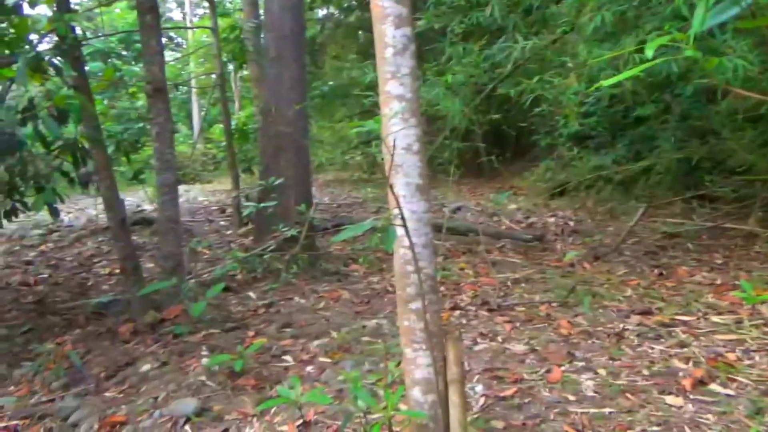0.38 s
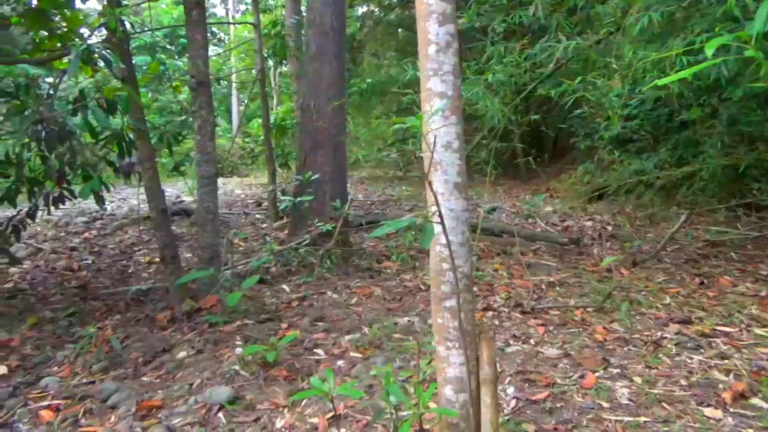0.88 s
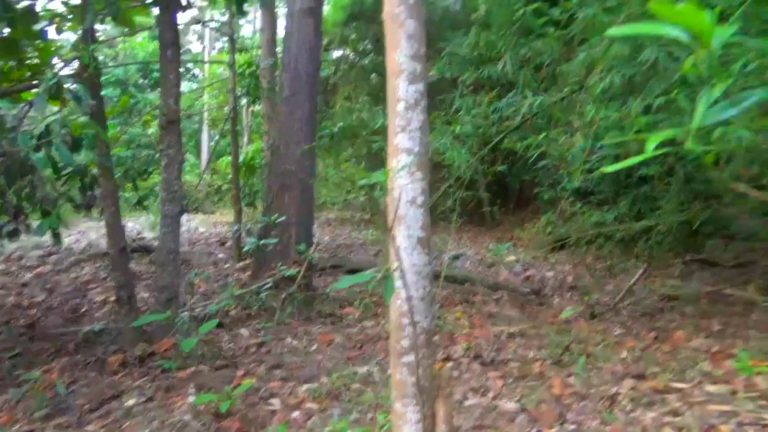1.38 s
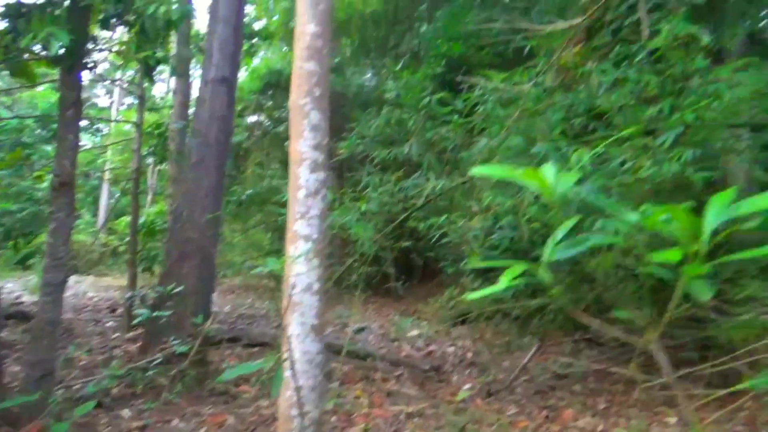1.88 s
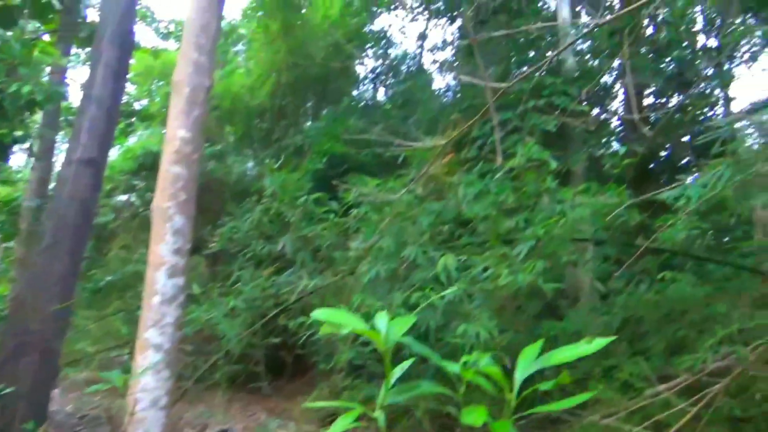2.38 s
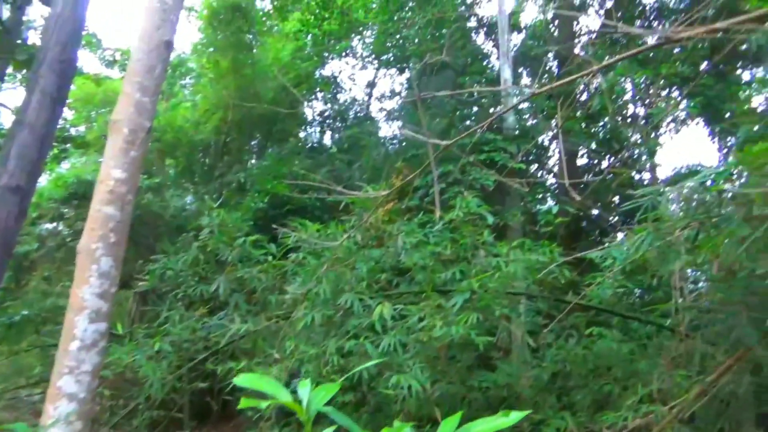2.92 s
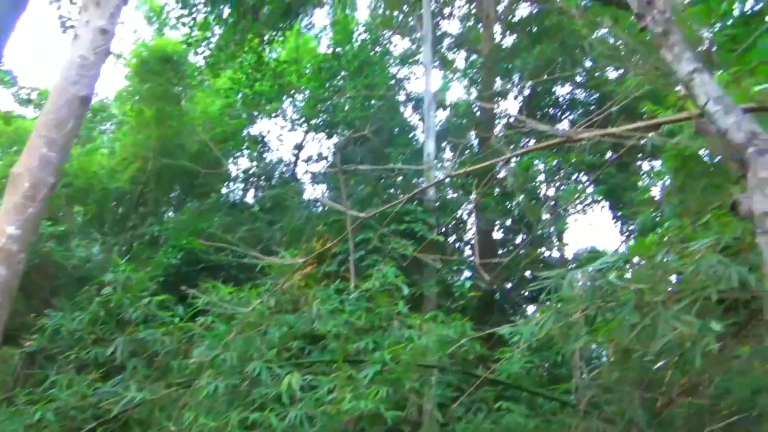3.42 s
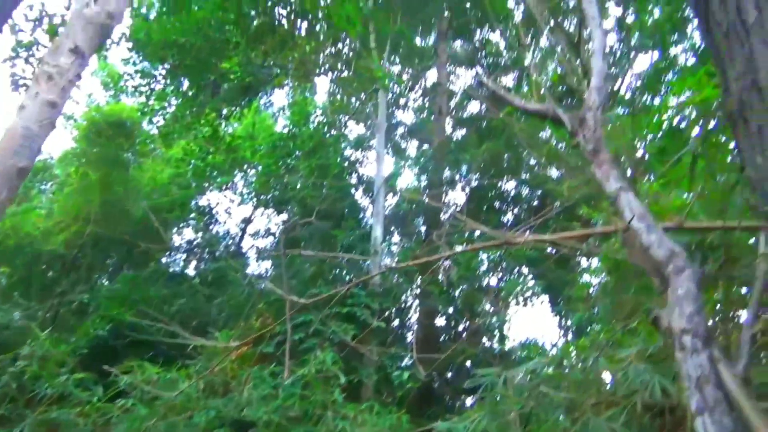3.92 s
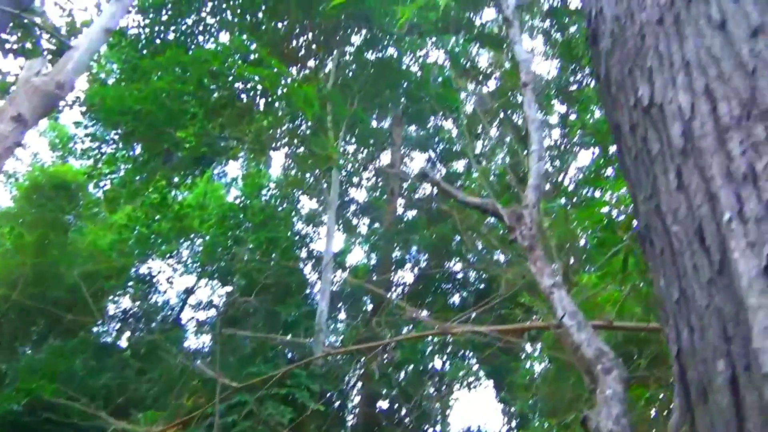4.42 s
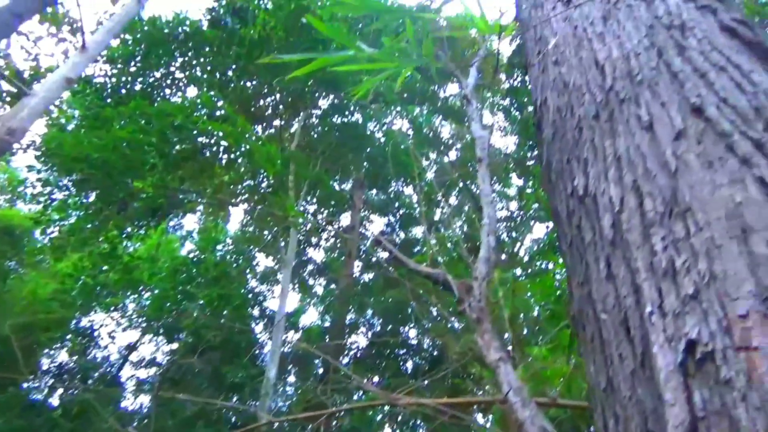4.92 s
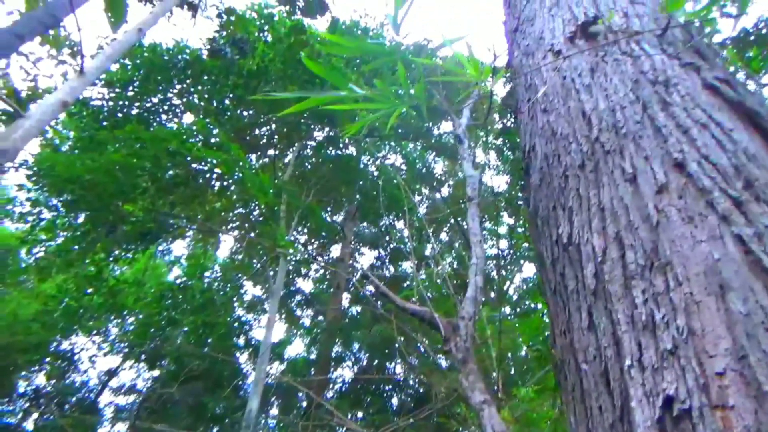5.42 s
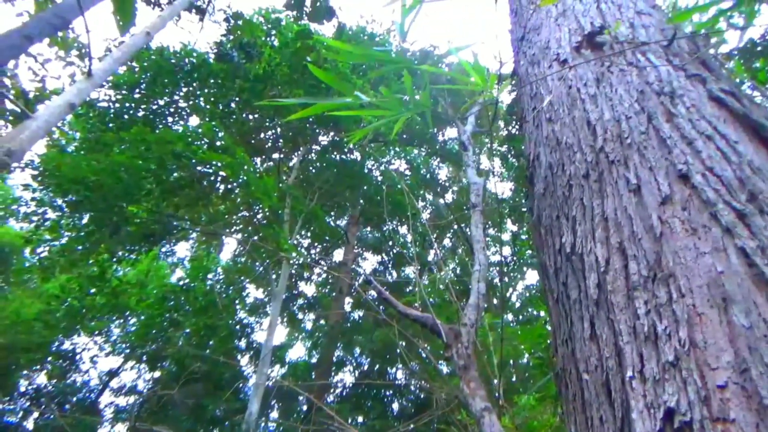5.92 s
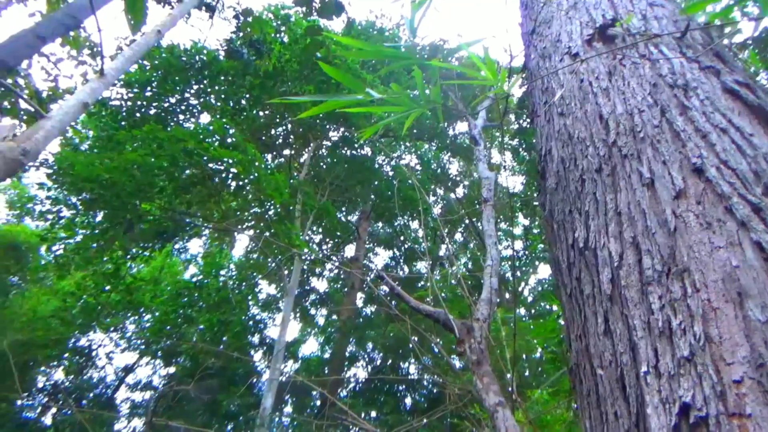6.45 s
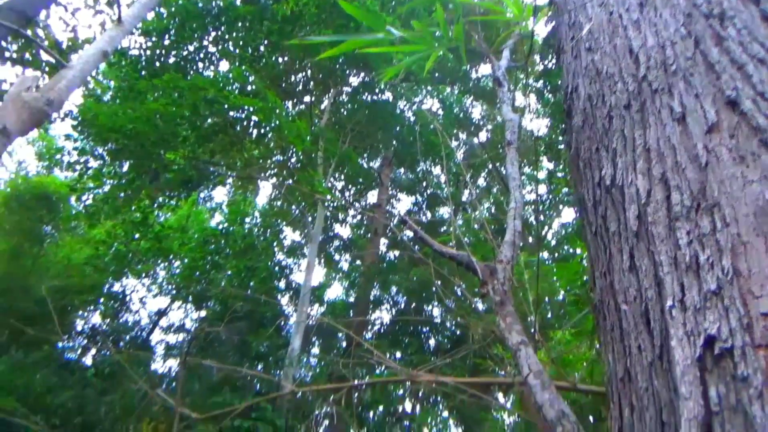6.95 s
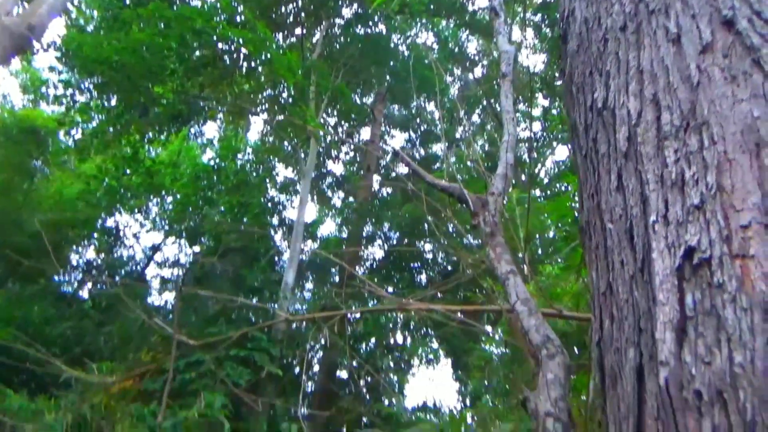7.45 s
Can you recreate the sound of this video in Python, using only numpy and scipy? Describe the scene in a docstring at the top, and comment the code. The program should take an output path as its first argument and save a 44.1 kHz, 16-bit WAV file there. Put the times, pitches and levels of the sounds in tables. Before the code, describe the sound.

A nearby cicada repeatedly buzzes low and winds up into a piercing held hiss, over a distant insect chorus, stirring leaves and hoarse bird rasps.

```python
"""A tropical forest by day, on one microphone. From the start a cicada buzzes low with its abdomen raised, then winds up
to a held high hiss: tymbal clicks, about two hundred a second, pulse the ringing of its body. Under it a second cicada
sings lower, far insects blend into a smooth hiss of noise, leaves stir as puffs of filtered noise and a rumble lies far
off. At 1 s and 3 s a hand softly bumps the microphone, a damped low tone; from 3 s a distant bird gives hoarse rasps,
two sliding strands of narrow noise. The near cicada repeats its buzz, wind-up and hiss until the end."""
import sys
import numpy as np
from scipy import signal
from scipy.fft import rfft, irfft, next_fast_len
from scipy.io import wavfile
from scipy.ndimage import uniform_filter1d, map_coordinates

SR = 44100
rng = np.random.default_rng(int(sys.argv[2]) if len(sys.argv) > 2 else 0)


def boost_factor(decibels):
    """Convert a level in decibels to a linear amplitude factor."""
    exponent = np.asarray(decibels, float) / 20
    return 10 ** exponent


def persist_wave(psi):
    """Save psi, clipped to +-1, as 16-bit WAV."""
    counts = np.round(np.clip(psi, -1, 1) * 32767).astype(np.int16)
    wavfile.write(sys.argv[1], SR, np.atleast_2d(counts).T)


N = 333820

# Near cicada's phrases: (abdomen lifts [s], held note reached [s], first swell [dB], second swell [dB],
# upper modes relative to lower [dB])
PHRASES = [(-.07, 1.355, -64, -61.5, -4), (2.048, 3.361, -56, -54, 2), (4.114, 5.447, -47.5, -48.5, -0.5),
           (6.21, 7.32, -54, -52.5, -1)]
# Click rate of the muscle through the buzz: (time after the lift [s], rate [clicks/s])
BUZZ_RATE = [(-.07, 204), (.1, 195), (.29, 214), (.46, 228), (.59, 197)]
# Wind-up from the buzz to the held note: (share of the way [0-1], rate [clicks/s])
WIND_UP = [(.26, 213), (.63, 215.5), (1, 233)]
TOP_RATE = 233  # clicks per s on the held note
DROOP_S = .2  # the held note lets go this long before the next lift
# Abdomen posture: (time after the lift [s], raised [0-1])
LIFT = [(-.1, 0.02), (.12, 0.9), (.36, 0.75), (.6, 0)]
# buzz shape, s after the lift: top of the first swell, dip, top of the second swell, cut, silence
SWELL_S, DIP_S, AGAIN_S, CUT_S, OVER_S = 0.068, 0.2, 0.38, 0.507, 0.61
# start under the first swell, dip under the mean of the swells, cut under the second swell
SWELL_FROM_DB, DIP_DB, SAG_DB = 10, 4.5, 6
# Body modes with the abdomen raised, a lower and an upper group: (frequencies [Hz])
BUZZ_HZ = [
    [1975, 2190, 3990, 4200, 4385, 4521, 4700],
    [5000, 5290, 5520, 5690, 6050, 6290, 6410, 6550],
]
# Relative levels of those modes, by group: (levels [dB])
BUZZ_DB = [
    [-12, -13, -7, -3, -4, -8, -9],
    [-1, -1, -1, 0.5, 0.5, -0.5, -1.5, -6],
]
# Membrane tone on each held note: (time [s], frequency [Hz])
MEMBRANE = [(1.6, 2133), (3.7, 2136), (5.8, 2140), (7.4, 2143)]
SLACK_SAG_HZ = 340  # drop of the membrane tone per unit of slack (0 at the top rate, 1 at rest)
# Abdomen down: overtones of the membrane with side tones one click rate apart, in five groups, low to high:
# (overtone number, first side tone, last side tone)
SIDE_TONES = [
    [(1, -1, 1)],
    [(2, 5, 9), (3, 0, 0)],
    [(3, 6, 9)],
    [(4, -1, 4)],
    [(4, 5, 11)],
]
# Body resonance that shapes each group: (frequency [Hz], level [dB])
RESONANCES = [
    [(1700, -12), (1900, -1.5), (2140, 0), (2370, -9)],
    [(5300, -10), (5680, -3), (5900, -4), (6140, 0), (6280, -8), (6420, -2), (6600, -12)],
    [(7500, -14), (7820, -5), (8050, 0), (8290, -9), (8500, -15)],
    [(8100, -10), (8330, -1), (8500, 0), (8800, -2), (9100, -4), (9500, -6)],
    [(9400, -9), (9730, -5), (9960, -5), (10170, 0), (10420, -2.5), (10650, -8), (11000, -10)],
]
# Loss of each group, low to high, with the abdomen fully raised: (loss [dB])
RAISED_LOSS_DB = [2.7, 0.95, 6.6, 2.4, 8.6]
# Gain of each group, low to high, on the held note: (gain [dB])
HELD_GAIN_DB = [6, 0.78, 0.55, 1.3, 0.85]
# The turning microphone hears the groups differently; levels before the loss and gain above:
# (time [s], level of each of five groups low to high [dB], shift of the third resonance [Hz])
FACING = [(0, -68.5, -53.5, -59, -58, -64, 218.5), (1.2, -78, -58, -61, -61.5, -61, 221.5),
          (1.799, -75, -57.5, -60, -58, -62.5, 217.5), (2.7, -73, -56, -61, -57, -60, 147),
          (3.6, -69, -58, -58.5, -55.5, -61, 100), (4.7, -66, -57, -55.5, -57.5, -52, 2),
          (5.899, -73, -59.5, -54.5, -55, -53.5, -1), (6.9, -67.5, -55, -54.5, -56, -53, 3),
          (7.12, -69, -59.5, -58, -54.5, -54.5, 0.5), (7.57, -59.5, -57.5, -58.5, -56, -53, 0.5)]
# Second, lower cicada, from which the microphone turns away: (time [s], rate [clicks/s], level [dB])
OTHER = [(0, 170, -54.5), (.5, 182, -54.5), (.9, 190, -53.5), (1.25, 120, -54.5), (2, 130, -57),
         (3, 130, -57.5), (4, 170, -64), (5, 120, -67), (7.57, 77, -71)]
# Its body modes: (frequencies [Hz])
OTHER_HZ = [1762, 7400, 7660, 9130, 9330, 9510]
# Relative levels of its modes: (levels [dB])
OTHER_DB = [-12.5, -6, -4.5, -4.5, -10, -3.5]
# Reference level of the far insects, offset for the chorus and for the soft hiss: (time [s], level [dB])
CHORUS = [(0, -52), (.8, -54.5), (2.1, -52.5), (2.8, -52), (3.7, -49.5), (4.7, -50.5), (5.3, -52.5),
          (6.4, -53), (6.8, -52), (7.57, -51.5)]
# Spectrum of the far insects: (frequency [Hz], relative density [dB per Hz])
FAR = [(2650, -34), (4500, -8), (5270, 1), (5720, -3.5), (6210, -1), (6740, -3.5), (7130, 1), (7650, -5.5),
       (8340, -1.5), (9690, -5), (10500, -5.5), (11000, -8.5), (14300, -38), (22000, -120)]
# Reference level of the breeze in the leaves, offset where used: (time [s], level [dB])
BREEZE = [(0, -63), (1.1, -63), (1.4, -61), (2.38, -62), (2.45, -59), (2.6, -59), (2.9, -61), (3.9, -59),
          (4.2, -57.5), (4.55, -56), (4.8, -57.5), (5.3, -58.5), (6.1, -60.5), (6.7, -60.5), (7.57, -57.5)]
# Spectrum of the leaves: (frequency [Hz], relative density [dB per Hz])
LEAVES = [(120, -14), (200, -7), (313, -4.5), (397, -0.5), (741, 0.5), (894, -1.5), (1010, 1.5), (1110, -1),
          (1220, 0.5), (1570, -4), (1740, -3.5), (2400, -4.5), (3120, -9.5), (5280, -120)]
# Spectrum of the soft hiss: (frequency [Hz], relative density [dB per Hz])
STILL = [(1060, -19.5), (1800, -12), (2170, -3.5), (2800, -9.5), (3230, -7.5), (3400, -0.5), (3800, 0),
         (4300, -4.5), (4700, -22), (6110, -37), (10300, -120)]
# Distant rumble: (time [s], level [dB])
DISTANT = [(0, -74), (.8, -70), (3.2, -71), (4.4, -69.5), (5.2, -70.5), (7.57, -70.5)]
# Spectrum of the rumble: (frequency [Hz], relative density [dB per Hz])
RUMBLE = [(12, -39.5), (20, -10), (53, -3), (250, -2.5), (320, -39), (550, -120)]
# Soft bumps of the hand: (time [s], initial envelope [dB], frequency [Hz])
BUMPS = [(1.074, -53.5, 145), (3.075, -59.5, 145)]
BUMP_T60_S = 0.096
# Bird's rasps: (start [s], length [s], top of the swell [dB], onset under that top [dB])
RASPS = [(3.023, .19, -51, 0.5), (3.557, 0.19, -48.5, 4), (5.89, 0.062, -61.5, -3), (6.778, 0.19, -51, 1),
         (7.098, .035, -58.5, 6), (7.244, 0.25, -48.5, 7)]
# a rasp swells in over a share of its length, sags, breaks off to a weak tail and fades
RASP_ATTACK_S, RASP_SWELL, RASP_SAG_DB = .02, .4, 3
RASP_BREAK_S, RASP_TAIL_DB, RASP_FADE_S = .03, 10.5, .11
RASP_FLUTTER_HZ, RASP_FLUTTER_DB = 33.8, 2.5  # central rate, swing either way
# Two sides of the bird's voice box: (time [s], stronger strand [Hz], weaker strand [Hz],
# weaker under stronger [dB], strand width [Hz])
STRANDS = [(3.01, 2980, 3000, 8, 300), (3.08, 2800, 3080, 4, 480), (3.15, 2880, 3250, 3, 560),
           (3.21, 2650, 3150, 2, 560), (3.55, 2920, 3050, 4, 400), (3.59, 3030, 3200, 1, 380),
           (3.78, 3030, 3200, 2, 400), (5.89, 2850, 2900, 9, 300), (5.97, 2680, 2750, 9, 300),
           (6.77, 3030, 3150, 5, 420), (6.85, 3050, 3330, 3, 600), (6.96, 3080, 3450, 5, 620),
           (7.09, 2960, 3000, 9, 350), (7.13, 2920, 3000, 9, 350), (7.24, 2550, 3150, 0, 650),
           (7.32, 2580, 3100, 3, 600), (7.39, 2850, 2550, 2, 600), (7.45, 3000, 2650, 1, 560),
           (7.51, 2900, 2650, 1, 560)]
# Spectrum of the broad scratch in the voice: (frequency [Hz], relative density [dB per Hz])
SCRATCH = [(150, -120), (350, -2.5), (1500, -2.5), (3500, 0), (4600, -7), (7000, -120)]
SCRATCH_DB = -4.5  # relative to the strands
TOP_HZ = 11020  # middle of the microphone's upper band edge


def unit(x):
    """Normalization of power: x scaled to rms 1."""
    return x / np.sqrt(np.mean(x ** 2) + 1e-20)


def curves(rows):
    """Linear interpolation: one value per sample for each column after the time."""
    s, *columns = np.transpose(rows)
    return [np.interp(np.arange(N) / SR, s, column) for column in columns]


def wobble(rate):
    """Band-limited random process: smooth through rate random knots a second; the rate may change with time."""
    place = np.cumsum(rate * np.ones(N)) / SR
    return map_coordinates(rng.standard_normal(int(place[-1]) + 4), [place])


def filtered(x, response):
    """Linear filtering: the spectrum of x times a response of frequency."""
    size = next_fast_len(N + 8192)
    return irfft(rfft(x, size) * response(np.fft.rfftfreq(size, 1 / SR)), size)[..., :N]


def coloured(x, spectrum):
    """Spectral shaping: x through (Hz, dB) points read on a log axis, at rms 1."""
    hz, db = np.transpose(spectrum)
    return unit(filtered(x, lambda f: boost_factor(np.interp(np.log(f + 1), np.log(hz), db))))


def patchy(depth_db, size):
    """Nonuniform noise: random gain in time and pitch; a long frame makes its patches narrow and lasting."""
    z = signal.stft(rng.standard_normal(N), nperseg=size)[2]
    field = uniform_filter1d(rng.standard_normal(z.shape), size=3, axis=0)  # across pitch
    field = uniform_filter1d(field, size=5, axis=1)  # across time
    return signal.istft(z * boost_factor(depth_db * unit(field)), nperseg=size)[1][:N]


def echoes(x, t60, wet):
    """Diffuse reverberation: trunks and leaves send back a share of the energy as a short decaying tail."""
    t = np.arange(SR // 2) / SR
    tail = rng.standard_normal(len(t)) * boost_factor(-60 * t / t60)
    tail /= np.linalg.norm(tail)
    share = np.clip(wet, 0, 1)
    return np.sqrt(1 - share) * x + np.sqrt(share) * signal.fftconvolve(x, tail)[:N]


def narrow(hz, spread_hz, clean):
    """Line broadening: a tone part clean, part smeared into a noise band with a dense core and thin skirts."""
    tone = np.exp(2j * np.pi * np.cumsum(hz * np.ones(N)) / SR)
    core, skirt = (wobble(width) + 1j * wobble(width) for width in (.6 * spread_hz, 1.3 * spread_hz))
    smear = np.sqrt((1 - clean) / 2) * (core + skirt)
    return (tone * (np.sqrt(2 * clean) + smear)).real


def body(hz, db, clean, beat, spread_hz):
    """Modal resonance: every click swells all the modes together, and their pitches waver as one."""
    waver_hz = 5 * wobble(30)
    ring = 0
    for f, level in zip(hz, db):
        ring = ring + boost_factor(level + 0.2 * wobble(6)) * narrow(f + waver_hz, spread_hz, clean)
    return unit(ring * beat)


def song():
    """Muscular control: click rate, raised posture and held note (0-1), laid out phrase by phrase."""
    rates, lifts, holds = [], [], []
    next_lifts = [row[0] for row in PHRASES[1:]] + [np.inf]
    for (s, held_s, *_), next_s in zip(PHRASES, next_lifts):
        low_s = s + BUZZ_RATE[-1][0]
        end_s = min(next_s - DROOP_S, N / SR)
        rates += [(s + after, rate) for after, rate in BUZZ_RATE]
        rates += [(low_s + share * (held_s - low_s), rate) for share, rate in WIND_UP]
        rates += [(end_s, TOP_RATE)]
        lifts += [(s + after, up) for after, up in LIFT]
        holds += [(held_s - .1, 0), (held_s + 0.138, 1), (end_s - .06, 1), (end_s + 0.04, 0)]
    return curves(rates)[0], curves(lifts)[0], curves(holds)[0]


def buzz_level(s, first_db, second_db):
    """Amplitude envelope: two swells with a dip between them, cut off as the abdomen drops."""
    after = np.array([0, SWELL_S, DIP_S, AGAIN_S, CUT_S, OVER_S])
    dip_db = (first_db + second_db) / 2 - DIP_DB
    db = [first_db - SWELL_FROM_DB, first_db, dip_db, second_db, second_db - SAG_DB, second_db - 24]
    return np.interp(np.arange(N) / SR, s + after, db, left=-120, right=-120)


def cicada_buzz(rate):
    """Pulsed excitation: with the abdomen raised, each click rings a lower and an upper group of body modes."""
    click = np.cos(2 * np.pi * np.cumsum(rate) / SR)
    lower = body(BUZZ_HZ[0], BUZZ_DB[0], .15, np.exp(.45 * click), spread_hz=270)
    upper = body(BUZZ_HZ[1], BUZZ_DB[1], .03, np.exp(.46 * click), spread_hz=330)
    return sum(boost_factor(buzz_level(s, first_db, second_db)) * (lower + boost_factor(upper_db) * upper)
               for s, _, first_db, second_db, upper_db in PHRASES)


def side_tones(group, resonance, membrane_hz, rate, shift_hz):
    """Modulation sidebands: pitch and level of a group's tones as they slide through its resonance."""
    hz = [overtone * membrane_hz + k * rate
          for overtone, first, last in group for k in range(first, last + 1)]
    points = np.transpose(resonance)
    return hz, [np.interp(f - shift_hz, *points, left=-30, right=-30) for f in hz]


def cicada_hiss(rate, raised, held):
    """Amplitude modulation: clicks put side tones on the membrane's overtones, cleanest at the top rate."""
    slack = np.clip(1 - rate / TOP_RATE, 0, 1)
    membrane_hz = curves(MEMBRANE)[0] - SLACK_SAG_HZ * slack
    clean = .45 * np.exp(-16 * slack)
    angle = 2 * np.pi * np.cumsum(rate) / SR
    click = np.cos(angle) + .2 * np.cos(2 * angle)
    *facing_db, shift_hz = curves(FACING)
    # one entry for each of the five groups, low to high
    depths = [.05, .14, .12, .12, .1]  # how deeply each click marks a group
    spreads_hz = [60, 170, 170, 220, 180]
    shifts_hz = [0, 0, shift_hz, 0, 0]
    hiss = 0
    for i, (group, resonance) in enumerate(zip(SIDE_TONES, RESONANCES)):
        level_db = facing_db[i] - RAISED_LOSS_DB[i] * raised + HELD_GAIN_DB[i] * held
        hz, db = side_tones(group, resonance, membrane_hz, rate, shifts_hz[i])
        hiss = hiss + boost_factor(level_db) * body(hz, db, clean, np.exp(depths[i] * click), spreads_hz[i])
    return hiss


def cicada():
    """Source and resonator: one click rate drives both postures of the body."""
    rate, raised, held = song()
    return echoes(cicada_buzz(rate) + cicada_hiss(rate, raised, held), t60=.2, wet=.15)


def other_cicada():
    """Pulsed resonance at a distance: the lines are blurred and the clicks half filled in."""
    rate, level_db = curves(OTHER)
    beat = np.exp(0.23 * np.cos(2 * np.pi * np.cumsum(rate) / SR))
    return boost_factor(level_db) * body(OTHER_HZ, OTHER_DB, .04, beat, spread_hz=260)


def far_insects():
    """Incoherent summation: the far chorus blends into smooth coloured noise."""
    return boost_factor(curves(CHORUS)[0] + 1.0) * coloured(patchy(depth_db=1.0, size=1024), FAR)


def leaves(puffs):
    """Random excitation: the breeze rustles the leaves in quick puffs of coloured noise."""
    rustle = coloured(boost_factor(1.38 * puffs) * patchy(depth_db=1.76, size=2048), LEAVES)
    return boost_factor(curves(BREEZE)[0] + 3.0) * rustle


def soft_hiss(puffs):
    """Modulated noise: a soft hiss flickers with the puffs, its level following the far chorus."""
    hiss = coloured(boost_factor(1.2 * puffs) * patchy(depth_db=2.0, size=1024), STILL)
    return boost_factor(curves(CHORUS)[0] - 11.0) * hiss


def distant_rumble():
    """Low-frequency noise: a distant rumble with a slowly shifting texture."""
    return boost_factor(curves(DISTANT)[0]) * coloured(patchy(depth_db=2.0, size=4096), RUMBLE)


def handling():
    """Damped oscillation: each bump is a low, quickly decaying push on the casing."""
    t = np.arange(N) / SR
    bumps = np.zeros(N)
    for s, db, hz in BUMPS:
        decay = boost_factor(db - 60 * np.clip(t - s, 0, 1) / BUMP_T60_S)
        bumps += decay * (t > s) * np.sin(2 * np.pi * hz * (t - s))
    return bumps


def rasp_level():
    """Amplitude envelope: each rasp swells, sags, breaks off to a weak tail and fades."""
    t = np.arange(N) / SR
    level = np.zeros(N)
    for s, length, db, soft_db in RASPS:
        steps = [-RASP_ATTACK_S, RASP_ATTACK_S, RASP_SWELL * length, (1 - RASP_SWELL) * length,
                 RASP_BREAK_S, RASP_FADE_S]
        under = np.array([soft_db + 17, soft_db, 0, RASP_SAG_DB, RASP_TAIL_DB, RASP_TAIL_DB + 4])
        level += boost_factor(np.interp(t, s + np.cumsum(steps), db - under, left=-120, right=-120))
    return level


def bird():
    """Two-source voice: sliding strands of narrow noise in a weaker scratch, with a fluttering, grainy level."""
    strong_hz, weak_hz, under_db, wide_hz = curves(STRANDS)
    weak_gain = boost_factor(-under_db)
    strands = narrow(strong_hz, wide_hz, clean=0) + weak_gain * narrow(weak_hz, wide_hz, clean=0)
    strands = strands / np.hypot(1, weak_gain)  # power kept as the balance changes
    voice = strands + boost_factor(SCRATCH_DB) * coloured(rng.standard_normal(N), SCRATCH)
    flutter = np.cos(2 * np.pi * np.cumsum(RASP_FLUTTER_HZ * (1 + 0.196 * wobble(8))) / SR)
    grain_db = wobble(90)
    rasps = rasp_level() * boost_factor(RASP_FLUTTER_DB * flutter + grain_db) * voice
    return echoes(rasps, t60=.22, wet=.3)


def scene():
    """Superposition: all sources add at one microphone, which feeds both channels."""
    puffs = wobble(22)
    background = far_insects() + leaves(puffs) + soft_hiss(puffs) + distant_rumble()
    return np.tile(cicada() + other_cicada() + background + handling() + bird(), (2, 1))


def band_limit(x):
    """A steep low-pass at the top of the band."""
    return signal.sosfilt(signal.butter(12, 11750, fs=SR, output="sos"), x)


def record(dry):
    """Band limitation: the response falls to nothing over 120 Hz about the upper band edge."""
    mix = filtered(dry, lambda hz: np.clip((TOP_HZ - hz) / 120 + .5, 0, 1))
    return band_limit(mix)


dry = scene()
out = record(dry)
persist_wave(out)
```